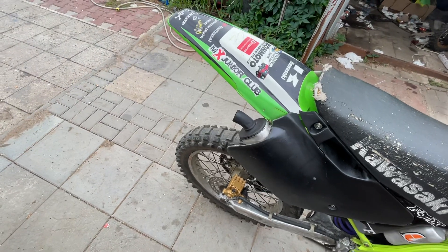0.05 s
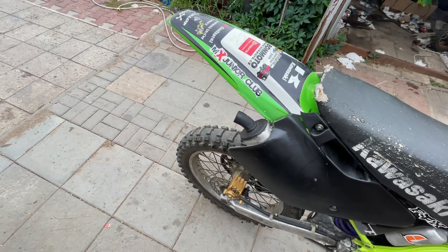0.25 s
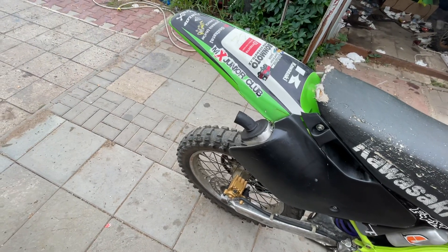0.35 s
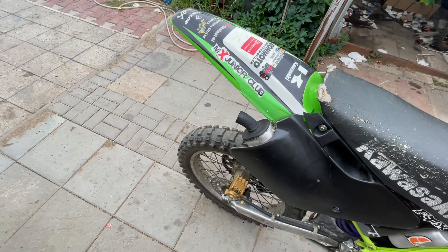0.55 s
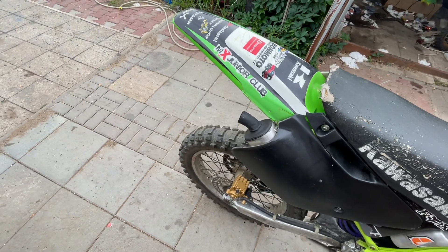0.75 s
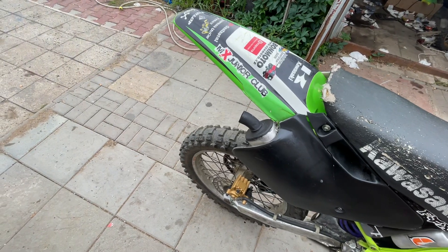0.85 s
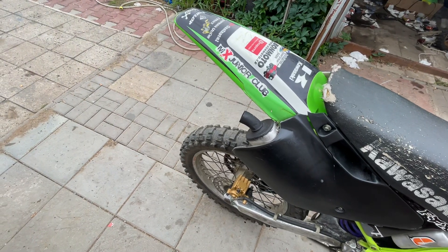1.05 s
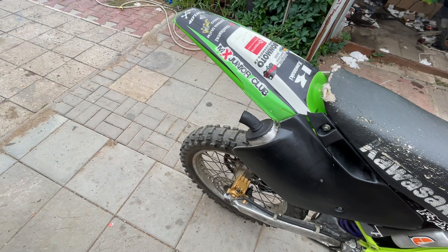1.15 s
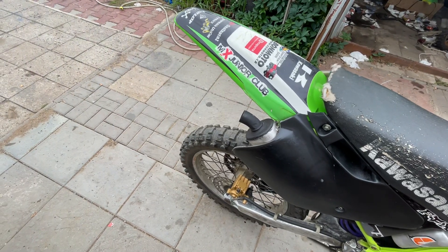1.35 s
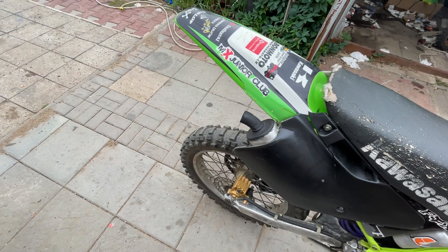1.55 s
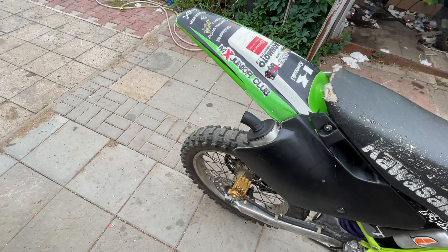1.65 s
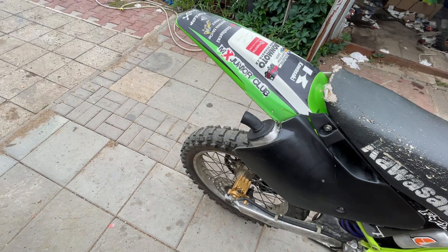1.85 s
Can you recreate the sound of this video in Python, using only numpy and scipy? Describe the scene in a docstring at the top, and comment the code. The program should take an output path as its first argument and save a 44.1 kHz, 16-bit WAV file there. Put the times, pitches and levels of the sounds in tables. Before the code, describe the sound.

A single-cylinder two-stroke motorcycle pops at idle, then is blipped twice, each rev a buzzing, crackling roar that rises fast and winds down with a softer rattly whirr; close stereo microphones in a paved yard.

```python
"""A paved yard: a single-cylinder two-stroke motorcycle stands there and is blipped twice from idle.
With the throttle open every turn fires: a crack from the silencer, a boom from the pipe, a puff of hiss.
With it shut the engine coasts down, pumping air in soft tones over mechanical rattle.
One crank drives it all: pulses ring resonances, sines follow its orders, gates pulse shaped noise.
Low thudding lies underneath, and walls return a few echoes."""
import sys
import numpy as np
from scipy import signal
from scipy.fft import rfft, irfft
from scipy.io import wavfile
from scipy.ndimage import uniform_filter1d

SR = 44100
rng = np.random.default_rng(int(sys.argv[2]) if len(sys.argv) > 2 else 0)


def nominal_scale(level):
    """Amplitude ratio for a level in decibels (scalar or array-like)."""
    x = np.asarray(level, float) / 20
    return 10 ** x


def generate_wav(sig):
    """Save sig (samples, or channels by samples) to the path in sys.argv[1] as 16-bit PCM at SR."""
    pcm = np.round(np.clip(np.atleast_2d(sig).T, -1, 1) * 32767).astype(np.int16)
    wavfile.write(sys.argv[1], SR, pcm)


N = 83790  # length in samples


def in_time(rows):
    """Columns of a table as curves over the samples."""
    s, *columns = np.transpose(rows)
    return [np.interp(np.arange(N) / SR, s, column) for column in columns]


def at_hz(points, hz):
    """A spectrum read on a log-frequency axis."""
    point_hz, value = np.transpose(points)
    return np.interp(np.log(np.maximum(hz, 1)), np.log(point_hz), value)


def rms_one(x):
    """Scale to rms 1."""
    return x / np.sqrt(np.mean(x ** 2) + 1e-20)


def evened(x):
    """Running level brought to 1, so that only the envelope sets loudness."""
    power = uniform_filter1d(uniform_filter1d(x ** 2, size=2000), size=2000)
    return x / np.sqrt(power + 1e-20)


def filtered(x, order, hz, kind="low"):
    """Butterworth filter."""
    return signal.sosfilt(signal.butter(order, hz, kind, fs=SR, output="sos"), x)


def drift(rate):
    """Slow chance, spread 1: noise through two equal one-pole smoothers, made at every 40th sample."""
    r = np.exp(-80 * np.pi * rate / SR)
    noise = rng.standard_normal(N // 40 + 2002)
    slow = signal.lfilter([1], [1, -2 * r, r * r], noise)[2000:]  # skip the settling
    return np.interp(np.arange(N) / 40, np.arange(len(slow)), rms_one(slow - slow.mean()))


def clicks(s, sizes):
    """Impulses at fractional sample places, each shared between two neighbours."""
    at = np.clip(np.asarray(s) * SR, 0, N - 2)
    whole = at.astype(int)
    here = np.bincount(whole, sizes * (1 - at + whole), N)
    following = np.bincount(whole + 1, sizes * (at - whole), N)
    return here + following + 1e-18


def ring(x, modes):
    """Parallel decaying modes with alternating signs."""
    out = 0
    for k, (hz, db, t60) in enumerate(modes):
        r, w = nominal_scale(-60 / (t60 * SR)), 2 * np.pi * hz / SR
        mode = signal.lfilter([0, np.sin(w)], [1, -2 * r * np.cos(w), r * r], x)
        out = out + (-1) ** k * nominal_scale(db) * mode
    return out


def late(x, s):
    """Delay by interpolated reading."""
    return np.interp(np.arange(N) - s * SR, np.arange(N), x, left=0)


# how alike left and right noise are: pitch_hz, likeness (1 same, -1 opposite; held to that range)
LIKENESS = [(60, 1), (290, 0.51), (640, 0.67), (1400, -0.5), (3000, -0.4), (3400, -1.21), (3800, 0.32),
            (10600, -0.21), (11200, 1), (12800, .97), (13300, 0.078), (13900, -1.12)]


def coloured_noise(spectrum):
    """Stereo noise, rms 1: mid and side mixed per frequency by the left-right likeness."""
    hz = np.fft.rfftfreq(N, 1 / SR)
    mid, side = rfft(rng.standard_normal((2, N)))
    alike = np.clip(at_hz(LIKENESS, hz), -1, 1)
    pair = np.sqrt(1 + alike) * mid + np.sqrt(1 - alike) * side * [[1], [-1]]
    return rms_one(irfft(nominal_scale(at_hz(spectrum, hz)) * pair, N))


# crank speed: time_s, speed_turns_per_s
CRANK_SPEED = [(0, 37.0), (0.15, 38.1), (0.184, 41.0), (0.242, 45.3), (0.408, 76.7), (0.496, 98.6),
               (0.524, 108.7), (0.534, 109.3), (0.792, 95.3), (0.876, 92.5), (1.056, 83.6), (1.12, 90.9),
               (1.198, 118.4), (1.226, 124.4), (1.26, 129.6), (1.304, 133.5), (1.368, 130.0),
               (1.558, 117.2), (1.718, 108.5), (1.792, 103.0), (1.9, 97.7)]
# clear firings that set the crank angle: time_s
CLEAR_FIRINGS = [.171, .195, .223, .2434, .3826, .4348, .4976, 1.0957, 1.1502, 1.2124, 1.2896]


def crank():
    """Speed and turns of the crank; whole turns lie between the clear firings."""
    speed, = in_time(CRANK_SPEED)
    turns, t = np.cumsum(speed) / SR, np.arange(N) / SR
    at = np.interp(CLEAR_FIRINGS, t, turns)
    whole = np.round(at[0]) + np.cumsum(np.round(np.diff(at, prepend=at[0])))
    return speed, turns + np.interp(t, CLEAR_FIRINGS, whole - at)


def firings(turns):
    """Times and uneven strengths of the firings, one a turn."""
    jitter_s, uneven_db = .00005, 1.8  # spreads
    chance = rng.standard_normal((400, 2))
    s = np.interp(np.arange(np.ceil(turns[0]), turns[-1]), turns, np.arange(N) / SR)
    chance = chance[:len(s)]
    return s + jitter_s * chance[:, 0], nominal_scale(uneven_db * chance[:, 1])


def puffs(train):
    """Each firing opens a short gate that dies away exponentially."""
    puff_s = 0.014  # time constant
    return evened(signal.lfilter([1], [1, -np.exp(-1 / (puff_s * SR))], train))


# echoes from walls: left_delay_s, level_db, right_delay_s
WALL_ECHOES = [(.0071, -12, 0.01112), (0.0134, -5, 0.013)]


def yard(x):
    """A few delayed copies from walls, arriving at different times left and right."""
    return sum(nominal_scale(db) * np.array([late(x, left), late(x, right)]) for left, db, right in WALL_ECHOES)


# low thudding: time_s, level_db
RUMBLE_LEVEL = [(0, -65), (.15, -49), (.3, -47), (.4, -33), (.5, -51), (.58, -75), (1.05, -79), (1.17, -54),
                (1.35, -73), (1.9, -75)]


def rumble():
    """Lumpy low band of noise, partly its own in each channel."""
    low = filtered(rng.standard_normal((2, N)), 3, [33, 68], "band")
    pair = low[0] + .25 * low[1] * [[1], [-1]]
    return nominal_scale(in_time(RUMBLE_LEVEL)[0]) * rms_one(pair)


# level of the treble hiss: time_s, level_db
HISS_LEVEL = [(0, -41.5), (.071, -52), (.075, -35.5), (.126, -50), (.2, -40), (.238, -46), (.243, -29.5),
              (.265, -33), (.3, -33), (.344, -28), (.505, -28), (.54, -37), (1.09, -35), (1.095, -20.5),
              (1.13, -26.5), (1.18, -28), (1.3, -27.5), (1.338, -35), (1.672, -39), (1.9, -36.5)]
# colour of the hiss: pitch_hz, density_db (per Hz, relative)
HISS_COLOUR = [(2000, -8), (3000, -41), (3400, -13), (4200, 1.5), (6900, 1), (7900, -3), (9000, 1.5),
               (9600, 2), (11000, -3), (12400, -11.5), (13200, -19), (14000, -15), (15700, -10.5)]


def hiss(gate):
    """Treble noise of rushing gas, partly puffing with the firings."""
    puff_share = 0.47
    level = nominal_scale(in_time(HISS_LEVEL)[0] + .5 * drift(38.0))
    return level * (1 + puff_share * gate) * coloured_noise(HISS_COLOUR)


# the turning engine, for rattle() and pumping(): time_s, tones_db, rattle_db
TURNING_LEVELS = [(0, -38, -33), (.15, -37.5, -35.5), (.3, -20.5, -26), (.45, -14.5, -23.5),
                  (.53, -21, -24.5), (.62, -21.5, -27), (.72, -30, -27.5), (.9, -26, -28),
                  (1.05, -25.5, -27.5), (1.15, -22, -21), (1.28, -28, -18.5), (1.34, -24.5, -27),
                  (1.45, -24.5, -26), (1.55, -28.5, -26), (1.62, -23, -31.5), (1.7, -26.5, -27),
                  (1.9, -34.5, -26.5)]
# colour of the rattle: pitch_hz, density_db (per Hz, relative)
RATTLE_COLOUR = [(40, -70), (101, -20), (152, -24), (283, -10), (499, -13), (687, -15), (845, -9),
                 (1100, -6), (1800, -6), (2700, -11), (4680, -26), (7920, -120)]


def rattle(gate):
    """Mechanical rattle as broad noise, unsteady and partly pulsing with the firings."""
    puff_share = 0.37
    level = nominal_scale(in_time(TURNING_LEVELS)[1] + 1.28 * drift(15.2))
    return level * (1 + puff_share * gate) * coloured_noise(RATTLE_COLOUR)


# resonances that the falling orders pass through, relative levels:
# pitch_hz, first_run_down_db, second_run_down_db
PASSAGES = [(111.6, -19, -48), (183.1, -25, -25), (277.6, -26, -11.5), (303.5, -29, -23), (356, -83, -18),
            (422.5, -29.5, -22), (490, -27, -22.5), (588.3, -28, -22), (665, -32, -31.5), (798, -24, -22.5),
            (860, -38, -33), (897, -29, -27.5), (1040, -43.5, -32), (1157, -37.5, -34.5),
            (1265, -36.5, -40), (1637, -39.5, -32)]
# fade from the first run-down's levels to the second's: start_s, end_s
PASSAGE_CHANGE = (1.05, 1.3)


def pumping(speed, turns):
    """Pumped air as orders of the crank: sines that swell as they cross a resonance."""
    width_hz, widens_hz_per_hz = 16, .025
    waver_db, waver_per_s, slip_rad = 1.0, 6.0, .02  # waver grows with the root of the order, slip with it
    after = np.interp(np.arange(N) / SR, PASSAGE_CHANGE, [0, 1])[::50]  # gains move every 50 samples
    hz, early_db, late_db = np.transpose(PASSAGES)[:, :, None]
    tops = nominal_scale(2 * (early_db + after * (late_db - early_db)))  # as power
    tones = 0
    for order in range(2, 21):
        off_peak = 2 * (order * speed[::50] - hz) / (width_hz + widens_hz_per_hz * hz)
        power = np.sum(tops / (1 + off_peak ** 2) ** 2, axis=0)
        waver = nominal_scale(waver_db * np.sqrt(min(order, 9)) * drift(waver_per_s))
        gain = np.repeat(np.sqrt(power), 50)[:N] * waver
        slip = slip_rad * order * drift(2.3) + rng.uniform(-1.23, 1)
        tones = tones + gain * np.cos(2 * np.pi * order * turns + slip)
    return nominal_scale(in_time(TURNING_LEVELS)[0]) * rms_one(tones)


# first order of the crank: time_s, peak_db
FIRST_ORDER_LEVEL = [(0, -60), (.25, -47), (.3, -27), (.46, -22), (.51, -42), (.54, -25.5), (.63, -30),
                     (.7, -34.5), (.79, -37), (.835, -43), (.9, -36.5), (1.0, -35), (1.07, -28),
                     (1.2, -18.5), (1.28, -19.5), (1.33, -32.5), (1.45, -24.5), (1.55, -31), (1.68, -26.5),
                     (1.9, -35)]


def first_order(turns):
    """The lowest tone: one sine cycle a turn."""
    return nominal_scale(in_time(FIRST_ORDER_LEVEL)[0]) * np.cos(2 * np.pi * turns)


# the air box hums as the throttle opens before the engine catches: time_s, level_db
INTAKE_LEVEL = [(1.0, -73), (1.03, -24.5), (1.07, -18), (1.09, -17.5), (1.12, -45), (1.15, -57)]
# its resonance: pitch_hz, level_db, t60_s (of a single pass)
AIR_BOX = [(249.5, 0, 0.21)]


def intake(train):
    """Each turn sucks air through one narrow resonance, applied twice so that it swells in."""
    return nominal_scale(in_time(INTAKE_LEVEL)[0]) * evened(ring(ring(train, AIR_BOX), AIR_BOX))


# lone firings at idle: time_s, strength_db
IDLE_POPS = [(.008, -33.5), (0.079, -28)]
# body of a pop: pitch_hz, level_db, t60_s
POP_BODY = [(112.5, 7.5, 0.16), (349, 9, 0.083), (597, 2, 0.014)]
# tick just before it: pitch_hz, level_db, t60_s
POP_TICK = [(805, 7, 0.027), (2230, 0.5, 0.019)]


def idle_pops():
    """Lone pulses ring a low body, each led by a higher tick."""
    tick_lead_s = .005
    s, db = np.transpose(IDLE_POPS)
    return ring(clicks(s, nominal_scale(db)), POP_BODY) + ring(clicks(s - tick_lead_s, nominal_scale(db)), POP_TICK)


# throttle, as the boom of the pipe: time_s, level_db
BOOM_LEVEL = [(0, -37), (.155, -34), (.175, -19.5), (.2, -18), (.225, -18.5), (.25, -11), (.34, -8.5),
              (.4, -8), (.46, -11), (.49, -12), (.515, -29), (.55, -65), (1.03, -76), (1.07, -35),
              (1.088, -21), (1.1, -8), (1.16, -10), (1.22, -12.5), (1.28, -8.5), (1.3, -19.5), (1.33, -82),
              (1.9, -72)]
# resonances of the pipe: pitch_hz, level_db, t60_s
PIPE = [(123, -16.5, 0.045), (182, -8, 0.08), (259.7, 3.5, 0.082), (337.7, -0.5, 0.18), (418.7, 1.5, 0.03)]


def boom(s, sizes):
    """A soft pressure pulse rings the pipe once a turn."""
    # the boom comes this far round the crank after the crack, less its shorter path
    after_turns, lead_s = .4, .0075
    pulses = clicks(s + after_turns * np.gradient(s) - lead_s, sizes)
    soft = filtered(pulses, 2, 528)
    return nominal_scale(in_time(BOOM_LEVEL)[0]) * evened(ring(soft, PIPE))


# combustion, as the crack of the silencer: time_s, level_db
CRACK_LEVEL = [(0, -44), (.18, -48), (.2, -42), (.225, -66), (.243, -27.5), (.3, -30.5), (.39, -25.5),
               (.5, -18), (.52, -58), (.56, -33), (1.085, -41), (1.094, -17), (1.13, -15), (1.2, -16),
               (1.29, -21), (1.315, -35), (1.34, -39), (1.9, -61)]
# resonances of the silencer: pitch_hz, level_db, t60_s
SILENCER = [(590, -13, .025), (1100, -12, .01), (805, -15, .035), (1600, -10, .008)]


def crack(train):
    """A sharp pulse and a burst of turbulence ring the silencer, beside the bare pressure spike."""
    turbulence_db, spike_db, spike_hz = -18, 15, 2750
    turbulence = puffs(train) * rng.standard_normal(N)
    drive = -evened(train) + nominal_scale(turbulence_db) * turbulence
    spike = drive - late(drive, 1 / spike_hz)
    sound = filtered(ring(drive, SILENCER) + nominal_scale(spike_db) * spike, 5, spike_hz)
    left = nominal_scale(in_time(CRACK_LEVEL)[0]) * evened(sound)
    return np.array([left, filtered(left, 1, 1400)])  # the frame shades the right


def scene():
    """Engine layers, echoes and noise."""
    crack_lead_s, puff_delay_s = .0004, .002  # both against the firing mark
    tone_echo_db, crack_echo_db = -5, -9
    speed, turns = crank()
    s, sizes = firings(turns)
    blows = filtered(boom(s, sizes) + idle_pops(), 2, 66.5, "high")
    low = blows + intake(clicks(s, sizes))
    tones = pumping(speed, turns)
    sharp = crack(clicks(s - crack_lead_s, sizes))
    gate = puffs(clicks(s + puff_delay_s, sizes)) - 1
    echoes = yard(low + nominal_scale(tone_echo_db) * tones + nominal_scale(crack_echo_db) * sharp[0])
    engine = low + tones + first_order(turns) + sharp
    return engine + echoes + hiss(gate) + rattle(gate) + rumble()


def roll_off(x):
    """The treble ends steeply here."""
    return signal.sosfilt(signal.butter(12, 16010, fs=SR, output="sos"), x)


# colour of the two microphones: pitch_hz, left_over_right_db
LEFT_OVER_RIGHT = [(40, 5), (99, -6.5), (270, -3.5), (450, 0), (740, -2), (1500, 3), (3300, -2.5),
                   (6000, 1.5), (7800, 2), (9300, -14.5), (10800, -0.5)]


def record(dry):
    """The two microphones differ in colour; peaks are rounded."""
    tilt = at_hz(LEFT_OVER_RIGHT, np.fft.rfftfreq(N, 1 / SR)) / 2  # half to each side
    coloured = irfft(rfft(dry) * nominal_scale(np.array([tilt, -tilt])), N)
    return roll_off(np.tanh(coloured))


dry = scene()
out = record(dry)
generate_wav(out)
```